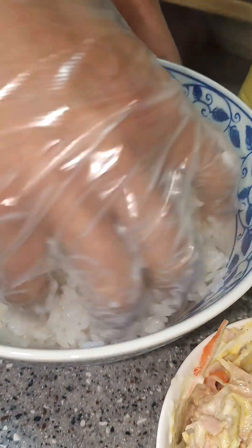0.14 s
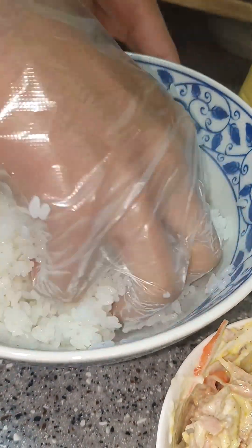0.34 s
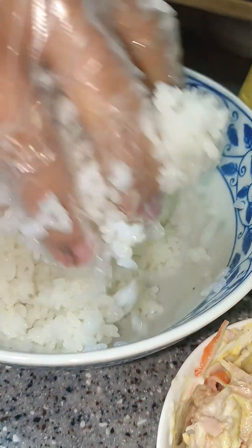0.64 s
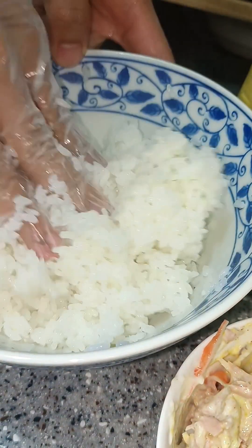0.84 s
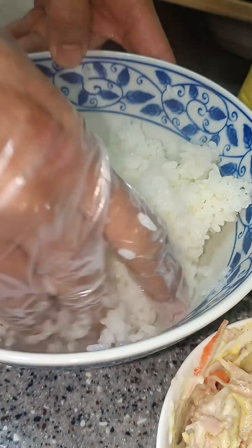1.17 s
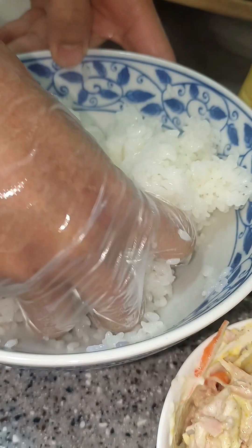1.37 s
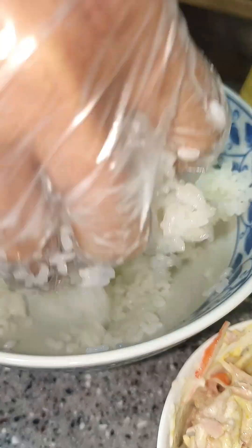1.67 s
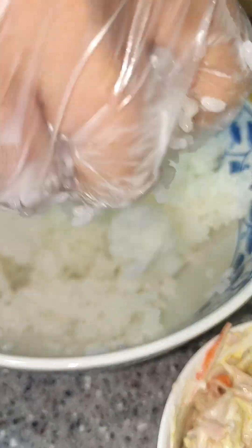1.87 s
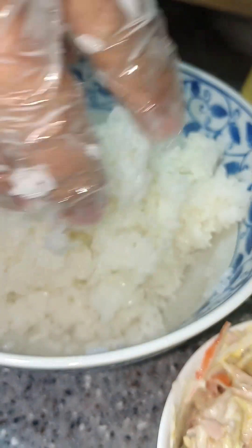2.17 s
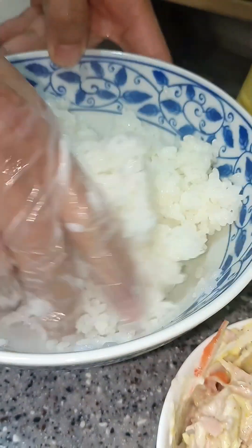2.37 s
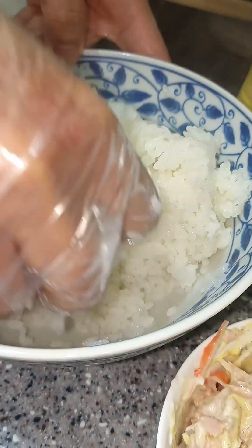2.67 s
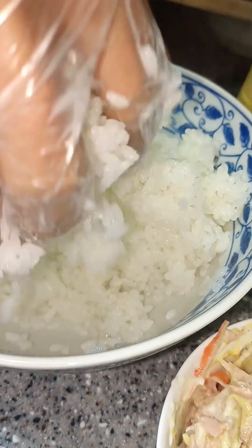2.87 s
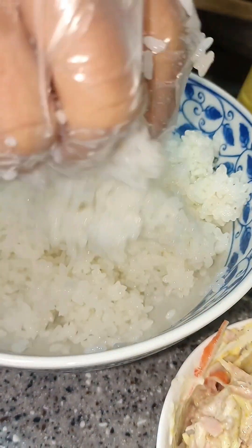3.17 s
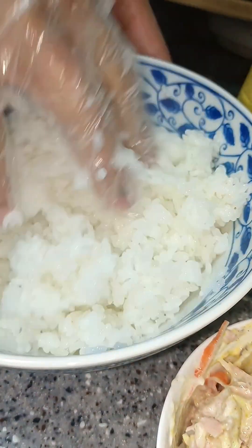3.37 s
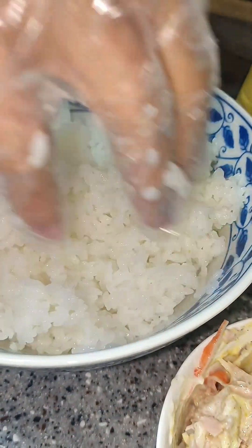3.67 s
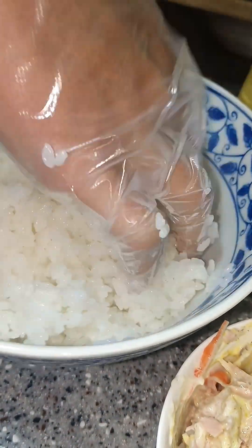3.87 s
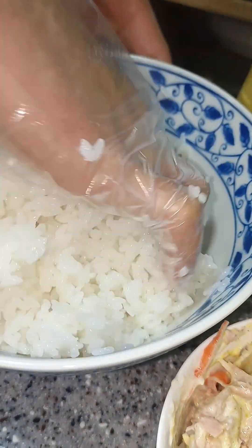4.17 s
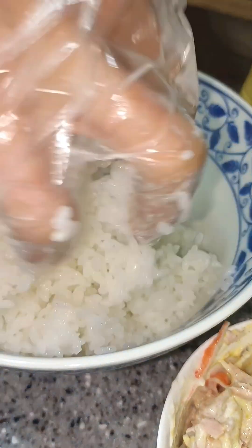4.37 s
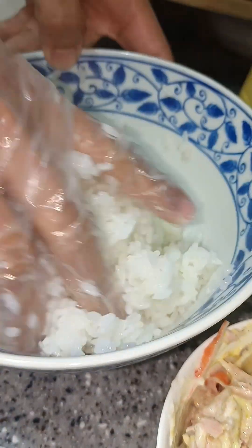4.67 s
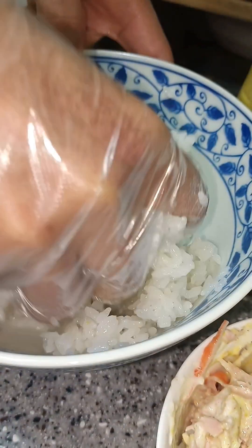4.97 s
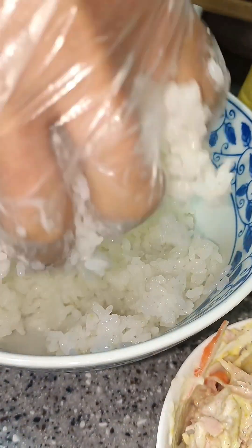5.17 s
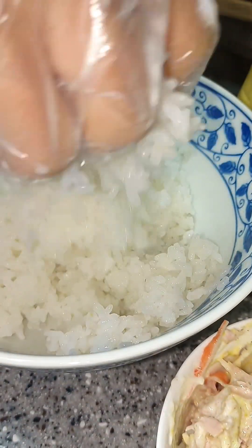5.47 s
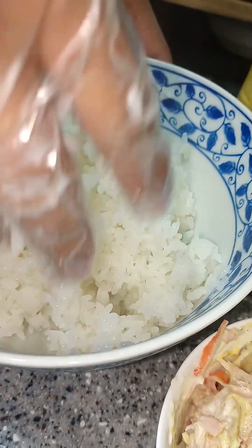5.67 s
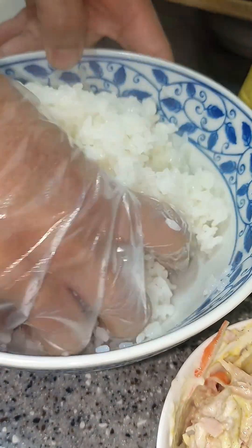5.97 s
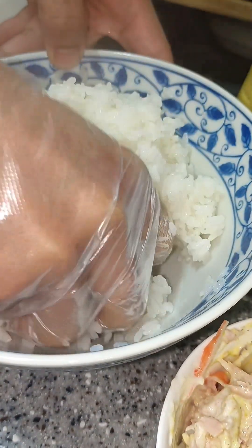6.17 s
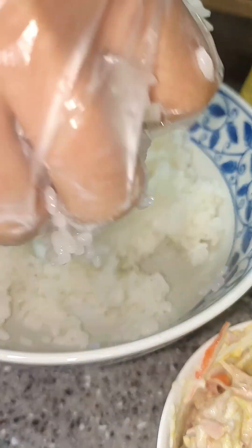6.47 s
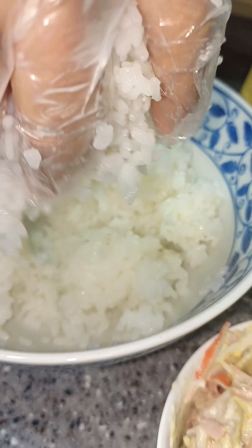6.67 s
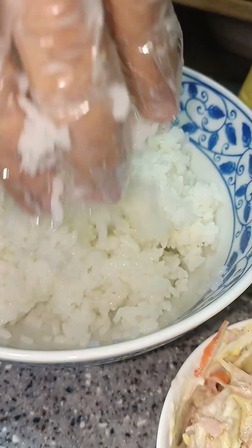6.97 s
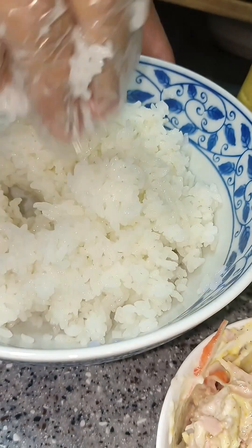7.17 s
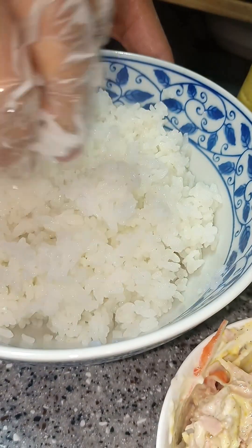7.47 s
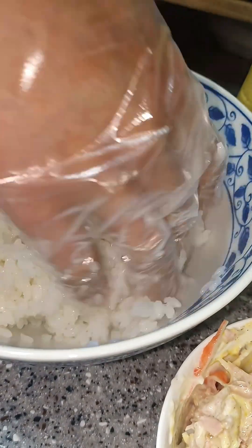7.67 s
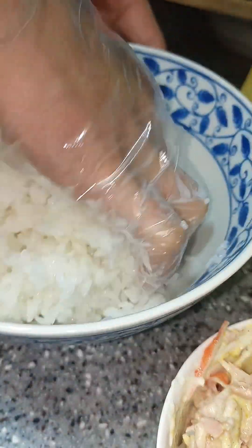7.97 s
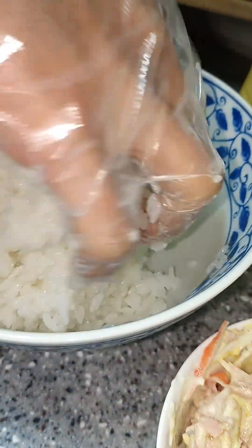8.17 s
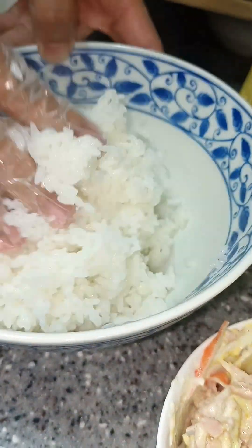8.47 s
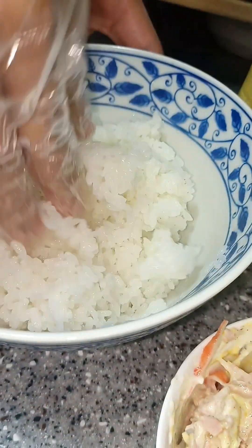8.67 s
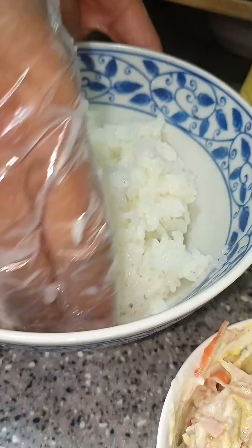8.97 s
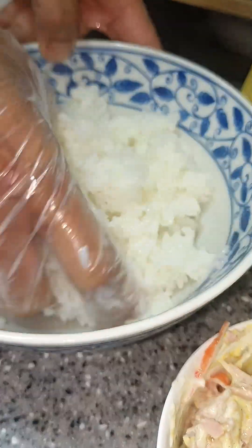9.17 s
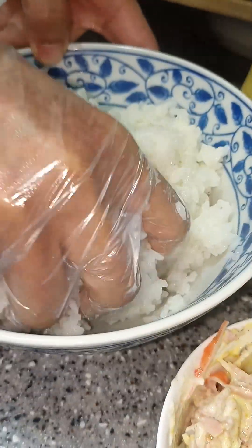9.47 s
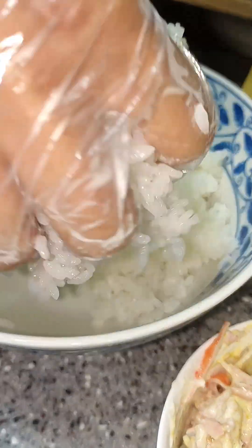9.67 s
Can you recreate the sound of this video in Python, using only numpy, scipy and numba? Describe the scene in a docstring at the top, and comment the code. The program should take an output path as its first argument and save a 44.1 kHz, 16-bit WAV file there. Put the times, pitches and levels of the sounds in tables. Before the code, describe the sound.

Thin plastic crackles almost continuously in short irregular surges, two to four per second, as a gloved hand grabs, presses and releases sticky rice. Tiny glassy ticks and harder snaps stand out, wet grains squish softly underneath. A ceramic bowl gives dull, briefly ringing bumps on the counter, mostly during the first five seconds, with a few later. Heard very close, with short room reflections and a quiet background.

```python
"""Gloved hand kneading rice

A hand in a thin plastic glove kneads cooked rice in a china bowl on a kitchen counter, close to two ports.
Swarms of short ringing grains make the crinkle of the film; single snaps are flips with a glassy edge.
The rice squelches in grains that follow the pitch of the hollow under the hand, with a faint bowl ring.
Knocks and bumps ring the bowl's modes, slips make it judder on the counter; a small room, low rumble
and quiet air lie behind."""
import sys
import numpy as np
from scipy import signal
from scipy.fft import rfft, irfft
from scipy.io import wavfile
from scipy.ndimage import uniform_filter1d
from numba import njit

SR = 44100
rng = np.random.default_rng(int(sys.argv[2]) if len(sys.argv) > 2 else 0)


def unload_wav(signal):
    """Save mono or channel-first audio to the path in sys.argv[1] as 16-bit WAV at rate SR, clipped to [-1, 1]."""
    wavfile.write(
        sys.argv[1],
        SR,
        np.round(np.clip(np.atleast_2d(signal).T, -1, 1) * 32767).astype(np.int16),
    )


N = 433503

# All levels are relative: source gains and the colour of the ports come on top.
# grabs, squeezes and releases of the fingers:
# height t/s, swell t/s, fade t/s, crinkle level/dB, squelch level/dB
HAND_STROKES = [(0.246, 0.11, 0.14, -40.5, -48.5), (0.47, 0.39, 0.12, -54.5, -55),
                (0.77, 0.16, 0.22, -47, -53), (1.03, 0.1, 0.17, -55.5, -61.5), (1.241, 0.1, 0.18, -45, -54),
                (1.399, 0.079, 0.046, -41, -43), (1.529, 0.42, 0.11, -52.5, -54),
                (1.779, 0.1, 0.14, -49.5, -52.5), (2.155, 0.25, 0.15, -45.5, -53.5),
                (2.57, 0.18, 0.026, -44, -44), (2.702, 0.17, 0.064, -52.5, -50.5),
                (2.929, 0.097, 0.25, -48.5, -52.5), (3.14, 0.066, 0.18, -49.5, -59.5),
                (3.31, 0.067, 0.13, -46.5, -47.5), (3.501, 0.1, 0.13, -44.5, -49),
                (3.7, 0.091, 0.23, -52, -57), (3.971, 0.27, 0.12, -47, -50),
                (4.092, 0.025, 0.41, -58.5, -48.5), (4.559, 0.2, 0.21, -44, -53.5),
                (4.75, 0.076, 0.3, -45.5, -50.5), (5.02, 0.56, 0.11, -55.5, -50),
                (5.279, 0.12, 0.078, -42, -44), (5.45, 0.14, 0.013, -47, -54),
                (5.68, 0.36, 0.092, -47, -53), (6.059, 0.26, 0.2, -45.5, -48),
                (6.279, 0.62, 0.18, -59.5, -57), (6.558, 0.095, 0.34, -45, -51.5),
                (6.909, 0.063, 0.02, -44.5, -53.5), (7.05, 0.25, 0.22, -45, -52),
                (7.38, 0.11, 0.054, -44.5, -54), (7.51, 0.045, 0.2, -54.5, -64),
                (7.79, 0.1, 0.25, -44, -41.5), (8.07, 0.073, 0.34, -52, -53),
                (8.43, 0.099, 0.081, -42.5, -52), (8.66, 0.29, 0.044, -47.5, -56),
                (8.80, 0.18, 0.071, -48, -58.5), (8.979, 0.089, 0.2, -41.5, -49),
                (9.158, 0.06, 0.16, -45, -51), (9.539, 0.45, 0.099, -51, -50),
                (9.809, 0.077, 0.17, -45.5, -54.5)]
# large creases snapping through: t/s, body level/dB, glassy edge level/dB
CREASE_SNAPS = [(0.0825, -31.0, -50.0), (0.127, -28.5, -65.5), (0.256, -26, -48), (0.7443, -40, -38),
                (0.814, -31.5, -42), (1.276, -28, -49), (1.781, -49, -34), (1.9451, -41, -38),
                (1.9548, -53, -38), (2.0671, -48, -39.5), (2.1126, -27, -54), (2.207, -28, -48.0),
                (2.3002, -57, -42), (2.3607, -47, -41.5), (2.3987, -29.5, -36.5), (2.485, -38, -37.5),
                (3.0301, -27, -53), (3.0769, -41, -44), (3.2635, -34.5, -44.5), (3.3346, -22.0, -37),
                (3.3743, -27, -43), (3.3875, -28.5, -49), (3.4229, -24, -48), (3.4776, -26.0, -44),
                (3.5859, -30.5, -52.0), (3.6978, -30.5, -48), (3.8061, -32.5, -55), (3.946, -29, -41),
                (4.8192, -25.0, -46), (5.5077, -36, -38), (5.643, -30.5, -40), (5.7831, -32.5, -39),
                (5.7975, -25.5, -47), (6.146, -31, -59), (6.5928, -24, -38), (6.829, -34.5, -36),
                (7.0231, -25.5, -50.0), (7.0866, -31.0, -51), (7.118, -30.5, -43), (7.1563, -28, -57),
                (7.3635, -31.0, -52), (7.7177, -30.5, -71), (7.7699, -26.5, -48), (7.831, -28.5, -54.0),
                (7.9001, -26, -52), (8.385, -30.0, -50), (8.4105, -24.5, -43), (8.4224, -33, -40),
                (8.453, -25, -43), (8.5367, -27, -46), (8.9478, -31, -56), (9.074, -28.0, -42),
                (9.1079, -31.5, -44.0)]
# the hollow between hand, rice and bowl opens and closes: t/s, f/Hz
HOLLOW_PITCH = [(.4, 1430), (.75, 1630), (0.95, 1310), (1.9, 2010), (2.25, 850), (2.65, 1710), (3.3, 2150),
                (3.85, 1390), (4.55, 1040), (4.78, 1910), (5.45, 1445), (5.9, 1160), (6.131, 1750),
                (6.36, 1210), (6.62, 1930), (7.58, 1024), (7.87, 1810), (8.1, 1160), (8.5, 1530)]
# the bowl knocking on the counter, each a fixed delay after its time:
# t/s, thump level/dB, hollow body level/dB, clack level/dB
BOWL_KNOCKS = [(1.081, -58, -50, -62), (1.252, -27, -30.5, -40), (1.676, -42, -45.5, -54.5),
               (2.43, -40, -39, -48), (2.8572, -26.5, -21.5, -27), (3.619, -28.5, -28.5, -42),
               (3.852, -54.5, -41.5, -54), (4.064, -18, -24, -19), (4.320, -18.5, -19.5, -24.5),
               (4.743, -35.5, -40.5, -75), (5.094, -41.5, -37, -49.5), (6.425, -29, -27.5, -37),
               (7.772, -31.5, -36.5, -60)]
# fingertips bump the bowl through the cushion of rice: t/s, level/dB
FINGER_BUMPS = [(0.304, -37.5), (2.53, -49), (7.423, -52.5), (7.739, -40), (8.974, -40.5), (9.315, -44.5),
                (9.442, -45)]
# the hand leans on the bowl and it judders: height t/s, swell t/s, fade t/s, level/dB
BOWL_PUSHES = [(.26, 0.068, 0.17, -47), (2.47, 0.044, 0.2, -51), (3.932, 0.1, 0.19, -55.5),
               (4.55, 0.37, 0.097, -52), (7.08, 0.094, 0.11, -58.5), (7.78, 0.048, 0.22, -47.5),
               (9.0, 0.054, 0.15, -49), (9.5, 0.1, 0.098, -48.5)]
# bowl and counter ringing together, damped by the rice: f/Hz, level/dB, 60 dB decay t/s
BOWL_MODES = [(143.6, -2, 0.21), (268.7, 4.5, 0.175), (380, -1, 0.09), (457, -3.5, 0.14), (578, -17, 0.14),
              (699.5, -4.5, 0.095), (1009.6, 0, 0.1), (1356, 1, 0.057), (1988, -11.5, 0.1),
              (2150, -22.5, 0.15)]
# tone of the plastic film: f/Hz, level/dB
FILM_TONE = [(300, 10.5), (900, -23.5), (2000, -8), (3600, 1.5), (6000, 2), (10000, -9.5), (16000, -3)]
# tone of the wet rice: f/Hz, level/dB
RICE_TONE = [(150, -13), (450, 4), (800, 2.5), (1300, 1), (2200, 0), (6000, 12), (12000, -40)]
# tone of the foot of the bowl rubbing on the counter: f/Hz, level/dB
RUB_TONE = [(35, -20), (130, 0.5), (200, -10.5), (268, -1), (340, -7), (700, -20), (2000, -46.5)]
# tone of the noisy rattle in a landing of the bowl: f/Hz, level/dB
RATTLE_TONE = [(40, -51.5), (105, 4), (160, 7.5), (200, -12), (290, -4), (1500, -11), (3500, -19),
               (7000, -41)]
# tone of the quiet air: f/Hz, level/dB
AIR_TONE = [(50, -13), (250, -23.5), (16000, -13.5)]
# colour of the two microphone ports: f/Hz, left level/dB, right level/dB
PORT_COLOUR = [(275, -1, -1.5), (806, 4, 4), (1226, 0, 4), (2000, 7.5, 6.5), (2930, 2, 5), (4000, 0.5, 4),
               (4350, -2.5, -2.5), (5740, -6.5, 8), (6650, -3.5, 2), (8610, 12.5, -1), (12300, 7.5, 4),
               (15600, 5.5, 8)]

# a movement climbs DEPTH_DB through its swell and drops as far through its fade; powers bend the slopes
DEPTH_DB, SWELL_POWER, FADE_POWER = 18.5, 2.2, 1.58
# between movements the glove and the rice are almost still
REST_CRINKLE_DB, REST_SQUELCH_DB, REST_PUSH_DB = -72.5, -95, -79
# the film gives way in small jerks, each a sudden rise that dies at once
JERKS_PER_S, JERK_DB, JERK_T60_S = 32, 3.5, .09
CONTROL_STEP = 64   # samples between points of a level curve
HAND_PAN_DB = 1.96   # the hand works a little to the right; the bowl stands in the middle
# the left port mostly hears the hand later than the right; the lag varies from spot to spot
PORT_LAG_S, LAG_SPREAD_S = .00019, .00012
SIDES = np.array([[1], [-1]])   # the side signal reaches the two ports with opposite signs
HAND_ROOM_T60_S, HAND_ROOM_DB = 0.13, -3.5
BOWL_ROOM_T60_S, BOWL_ROOM_DB = 0.38, -9.5
AIR_DB, CUTOFF_HZ = -77, 16200


def from_db(db):
    """Decibels to gain."""
    return 10 ** (np.asarray(db) / 20)


def rms_one(x):
    """Scale to rms 1."""
    return x / np.sqrt(np.mean(x ** 2) + 1e-20)


def evened(x, span_s=0.11):
    """Holds the short-term level at 1 and keeps the grain."""
    power = uniform_filter1d(np.mean(x ** 2, axis=0), int(span_s * SR))
    return x / np.sqrt(power + 1e-12)


def dying(t, t60):
    """Falls by 60 dB in t60."""
    return np.exp(-np.log(1000) * t / t60)


def drift(rate):
    """Slow chance with spread 1, given a new target rate times a second."""
    knots = rng.standard_normal(int(rate * N / SR) + 2)
    return rms_one(np.interp(np.arange(N) / SR * rate, np.arange(len(knots)), knots))


def colour(x, tone):
    """Causal (minimum-phase) filter with the given spectrum."""
    size = 4096
    hz, db = np.transpose(tone)
    grid = np.maximum(np.arange(size // 2 + 1) * SR / size, 1)
    cepstrum = irfft(np.log(from_db(np.interp(np.log(grid), np.log(hz), db))))
    # folding the cepstrum onto positive time puts the energy first
    cepstrum[1:size // 2] *= 2
    cepstrum[size // 2 + 1:] = 0
    response = irfft(np.exp(rfft(cepstrum)))
    return signal.fftconvolve(x, response[None], axes=-1)[:, :x.shape[-1]]


def band(x, low_hz, high_hz):
    """Band-pass, scaled to rms 1."""
    sos = signal.butter(2, [low_hz, high_hz], "band", fs=SR, output="sos")
    return rms_one(signal.sosfilt(sos, x))


def add(out, s, sound):
    """Mix a stereo sound in at time s."""
    i = max(int(s * SR), 0)
    out[:, i:i + sound.shape[-1]] += sound[:, :N - i]


def pop(clicks, hz, cycles):
    """Each click rings for a few cycles; all pitches carry the same energy."""
    r, w = dying(1 / SR, cycles / hz), 2 * np.pi * hz / SR
    ring = signal.lfilter([1, 0, -1], [1, -2 * r * np.cos(w), r * r], clicks + 1e-18)
    return np.sqrt(1 - r * r) * ring


def placed(x, place, pan_db=3.0):
    """A spot on the hand, heard at the two ports with its own lag and balance."""
    lag = int(round((PORT_LAG_S + LAG_SPREAD_S * place) * SR))
    return np.array([np.roll(x, lag) * from_db(-pan_db * place), x * from_db(pan_db * place)])


@njit
def ring_grains(at, turn, keep, length, lag, left, right, n):
    """Every grain is a short ring of its own, heard at both ports."""
    out = np.zeros((2, n))
    for g in range(len(at)):
        now, last, before = 1.0, 0.0, 0.0
        pull = 2 * keep[g] * np.cos(turn[g])
        for i in range(at[g], min(at[g] + length[g], n)):
            out[0, (i + lag[g]) % n] += left[g] * (now - before)
            out[1, i] += right[g] * (now - before)
            now, last, before = pull * now - keep[g] ** 2 * last, now, last
    return out


def grains(per_s, spread_db, centre_hz, scatter_oct, wander_oct, cycles, clump_per_s=45, pan_db=9.0):
    """Random uneven clicks; those of one clump share roughly a pitch; their places are widely scattered."""
    at = np.flatnonzero(rng.random(N) < per_s / SR)
    fold, spot = drift(clump_per_s)[at], drift(clump_per_s)[at]
    size, scatter, offset, sign = (rng.random((len(at), 4)) * .998 + .001).T
    # pitch wanders with the fold, then scatters with long tails
    octaves = wander_oct * fold + scatter_oct * np.log(scatter / (1 - scatter))
    hz = np.clip(np.broadcast_to(centre_hz, N)[at] * 2 ** octaves, 250, .42 * SR)
    t60 = cycles / hz
    keep = dying(1 / SR, t60)
    # many small clicks and a few large ones, of either sign
    gain = from_db(spread_db * np.minimum(-np.log(size), 3.0)) * np.sign(sign - .5)
    gain = gain * np.sqrt(1 - keep ** 2)
    place = spot / 2 + 2 * (2 * offset - 1)
    pan = from_db(pan_db * place)
    gain = gain / np.hypot(pan, 1 / pan)
    lag = np.round((PORT_LAG_S + LAG_SPREAD_S * place) * SR).astype(int)
    length = (t60 * SR).astype(int) + 2
    return ring_grains(at, 2 * np.pi * hz / SR, keep, length, lag, gain / pan, gain * pan, N)


def movement(s, swell_s, fade_s):
    """Level in dB of one movement of the hand, 0 at its height."""
    t = np.arange(0, N, CONTROL_STEP) / SR - s
    swell, fade = np.abs(t / swell_s) ** SWELL_POWER, np.abs(t / fade_s) ** FADE_POWER
    return -DEPTH_DB * np.where(t < 0, swell, fade)


def together(levels_db, rest_db):
    """Overlapping movements add in power over a resting level; dB at every sample."""
    power = from_db(rest_db) ** 2 + np.sum(from_db(levels_db) ** 2, axis=0)
    return np.interp(np.arange(N), np.arange(0, N, CONTROL_STEP), 10 * np.log10(power))


def effort():
    """How hard the glove is flexed, the rice squeezed and the bowl pushed, in dB."""
    flex = [db + movement(s, swell, fade) for s, swell, fade, db, _ in HAND_STROKES]
    squeeze = [db + movement(s, swell, fade) for s, swell, fade, _, db in HAND_STROKES]
    press = [db + movement(s, swell, fade) for s, swell, fade, db in BOWL_PUSHES]
    return (together(flex, REST_CRINKLE_DB), together(squeeze, REST_SQUELCH_DB),
            together(press, REST_PUSH_DB))


def jerks():
    """Uneven give of the film in dB, 0 on average; jerks pile up to a limit."""
    kicks = rng.random(N) < JERKS_PER_S / SR
    piled = signal.lfilter([1], [1, -dying(1 / SR, JERK_T60_S)], kicks + 1e-18)
    give = JERK_DB * np.minimum(piled, 2)
    return give - give.mean()


def crinkle(level_db, loose_per_s=650, tight_per_s=420, usual_db=-49, clump_db=5.0, tight_db=-5.5,
            gain_db=-3.0):
    """Creases buckle in clumps, more often under harder flexing: loose folds rustle, tight ones tick."""
    busy = from_db(.5 * (level_db - usual_db) + clump_db * drift(110))
    loose = grains(loose_per_s * busy, spread_db=5.0, centre_hz=4150, scatter_oct=0.23,
                   wander_oct=0.48, cycles=4.3)
    tight_runs = from_db(clump_db * drift(40))
    tight = grains(tight_per_s * busy * tight_runs, spread_db=1.5, centre_hz=11200, scatter_oct=0.38,
                   wander_oct=0.17, cycles=2.6)
    clicks = evened(loose) + from_db(tight_db) * evened(tight)
    return from_db(level_db + gain_db) * evened(colour(clicks, FILM_TONE), span_s=0.061)


def snaps(pitch_hz=5300, cycles=5.2, edge_hz=14500, edge_cycles=1.9, tremble_db=-16.0,
          tremble_t60=0.0098, body_gain_db=6.0, edge_gain_db=16.0):
    """A large crease flips at once with a glassy edge, and the film trembles for a moment."""
    out, t = np.zeros((2, N)), np.arange(512) / SR
    for s, body_db, edge_db in CREASE_SNAPS:
        flip = from_db(tremble_db) * rng.standard_normal(len(t)) * dying(t, tremble_t60)
        flip[0] = 1
        # each crease has a pitch of its own
        body = pop(flip, pitch_hz * from_db(rng.normal(0, 1.65)), cycles)
        edge = pop(flip, edge_hz, edge_cycles)
        snap = from_db(body_db + body_gain_db) * body / np.linalg.norm(body)
        snap = snap + from_db(edge_db + edge_gain_db) * edge / np.linalg.norm(edge)
        add(out, s, placed(2 * snap, (rng.random() - .5) / 2))
    return colour(out, FILM_TONE)   # the same film as the small creases


def rice(level_db, per_s=1800, gain_db=-3.5, glaze_db=-16.5):
    """Wet grains part near the pitch of the hollow; dragged over the glaze they make the bowl sing."""
    hollow_hz = np.interp(np.arange(N) / SR, *np.transpose(HOLLOW_PITCH))
    clicks = grains(per_s * from_db(4.0 * drift(45)), spread_db=3.5, centre_hz=hollow_hz,
                    scatter_oct=0.25, wander_oct=0.38, cycles=9.0)
    wet = evened(colour(clicks, RICE_TONE))
    # here every mode of the bowl is driven alike
    glaze = rms_one(sum(pop(wet, hz, hz * t60) for hz, _, t60 in BOWL_MODES))
    return from_db(level_db + gain_db) * (wet + from_db(glaze_db) * glaze)


def bowl_ring(t, wide_hz, spread_db=2.0):
    """Modes of the bowl after one touch; spot and grip change their strengths and shift them a little."""
    ring, grip = 0, 1 + rng.normal(0, 0.012)
    for hz, mode_db, t60 in BOWL_MODES:
        # high modes reach the two ports out of step
        phase = min(hz / wide_hz, 1) ** 2 * rng.normal(0, 2.3, (2, 1)) + np.pi * rng.integers(2)
        gain = from_db(mode_db + rng.normal(0, spread_db))
        ring = ring + gain * np.sin(2 * np.pi * hz * grip * t + phase) * dying(t, t60)
    return rms_one(ring)


def knock(thump_db, body_db, clack_db, bounce_s=.009, bounce_db=-5.0, rattle_db=-4.0,
          rattle_t60=0.23, clack_t60=0.8, wide_hz=620, body_hz=340, clack_hz=850):
    """The bowl lands in a few uneven bounces, each ringing its own way; the china clack fades faster."""
    t, both = np.arange(SR // 2) / SR, 0
    landings = np.cumsum(bounce_s * (.5 + rng.random(size=4)))
    side_cut = signal.butter(2, wide_hz / 2, "high", fs=SR, output="sos")
    for k, s in enumerate(landings - landings[0]):
        # a sharp burst at the touch, then a longer rattle
        rattle_fade = dying(t, rattle_t60) + 7.8 * dying(t, 0.003)
        mid, side = rng.standard_normal((2, len(t))) * rattle_fade
        side = signal.sosfilt(side_cut, side)
        rattle = rms_one(colour(mid + side * SIDES, RATTLE_TONE))
        contact = bowl_ring(t, wide_hz) + from_db(rattle_db) * rattle
        both = both + from_db(bounce_db * k) * np.roll(contact, int(s * SR), axis=1)
    thump = from_db(thump_db) * band(both, 66, body_hz)
    body = from_db(body_db) * band(both, body_hz, clack_hz)
    clack = from_db(clack_db) * band(both * dying(t, clack_t60), clack_hz, 6200)
    return thump - body + clack


def knocks(delay_s=0.002093, gain_db=-19.5):
    """Knocks of the bowl landing on the counter, all starting slightly after their listed times."""
    out = np.zeros((2, N))
    for s, thump_db, body_db, clack_db in BOWL_KNOCKS:
        add(out, s + delay_s, from_db(gain_db) * knock(thump_db, body_db, clack_db))
    return out


def bumps(low_hz=190, high_hz=370, press_s=0.0063, lead_s=.016, lead_db=-23):
    """A cushioned push builds over a moment and favours low bowl modes; a faint one leads each knock."""
    out, t = np.zeros((2, N)), np.arange(SR // 2) / SR
    ring = sum(from_db(db) * np.sin(2 * np.pi * hz * t) * dying(t, t60) for hz, db, t60 in BOWL_MODES)
    ring = ring * np.minimum(t / press_s, 1)
    sos = signal.butter(1, [low_hz, high_hz], "band", fs=SR, output="sos")
    soft = signal.sosfilt(sos, ring)
    leads = [(s - lead_s, thump_db + lead_db) for s, thump_db, _, _ in BOWL_KNOCKS]
    for s, db in FINGER_BUMPS + leads:
        add(out, s, from_db(db) * np.array([soft, soft]))
    return out


def rubbing(level_db, slips_per_s=700, side_db=-8.0):
    """The foot of the pushed bowl sticks and slips unevenly on the counter."""
    slips = rng.random(N) < slips_per_s / SR
    mid, side = slips * rng.standard_normal((2, N))
    return from_db(level_db) * evened(colour(mid + from_db(side_db) * side * SIDES, RUB_TONE))


def kitchen(x, t60, second_db=-19.5, second_t60=0.18):
    """Dense echoes of a small room die away at two rates, different at each port."""
    t = np.arange(SR // 2) / SR
    fade = dying(t, t60) + from_db(second_db) * dying(t, second_t60)
    echoes = rng.standard_normal((2, len(t))) * fade * (t > .001)   # a short gap first
    echoes = rms_one(echoes) / np.sqrt(len(t))
    echoes = colour(echoes, [(900, -1.5), (3000, 1.0), (7000, -4.0), (16000, 0.0)])
    return signal.fftconvolve(x, echoes, axes=-1)[:, :N]


def rumble(level_db=-80, swell_db=13.0, swells_per_s=5.6, low_hz=45, high_hz=85):
    """A faint low rumble, band-passed noise, comes and goes, alike at both ports."""
    level = from_db(level_db + swell_db * np.tanh(drift(swells_per_s)))
    return level * band(rng.standard_normal(N), low_hz, high_hz)


def air():
    """Steady quiet noise, separate at each port."""
    return from_db(AIR_DB) * rms_one(colour(rng.standard_normal((2, N)), AIR_TONE))


def scene():
    """Glove, rice and bowl in the quiet kitchen; the low knocks linger longer than the crinkle."""
    flex_db, squeeze_db, press_db = effort()
    hand = crinkle(flex_db + jerks()) + snaps() + rice(squeeze_db)
    hand = hand * from_db([[-HAND_PAN_DB], [HAND_PAN_DB]])
    bowl = knocks() + bumps() + rubbing(press_db)
    hand_room = from_db(HAND_ROOM_DB) * kitchen(hand, HAND_ROOM_T60_S)
    bowl_room = from_db(BOWL_ROOM_DB) * kitchen(bowl, BOWL_ROOM_T60_S)
    return hand + bowl + hand_room + bowl_room + rumble() + air()


def record(dry):
    """Each port has resonances of its own; the top is cut."""
    hz, *sides = np.transpose(PORT_COLOUR)
    heard = [colour(x[None], np.transpose([hz, db])) for x, db in zip(dry, sides)]
    top_cut = signal.ellip(10, .3, 70, CUTOFF_HZ, fs=SR, output="sos")
    return signal.sosfilt(top_cut, np.vstack(heard))


dry = scene()
out = record(dry)
unload_wav(out)
```